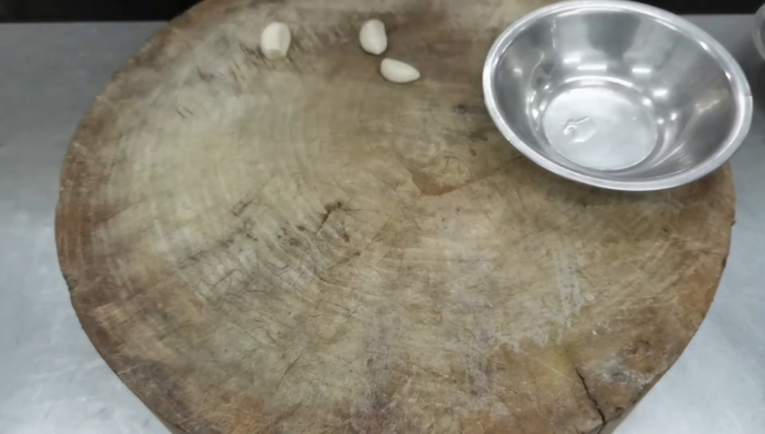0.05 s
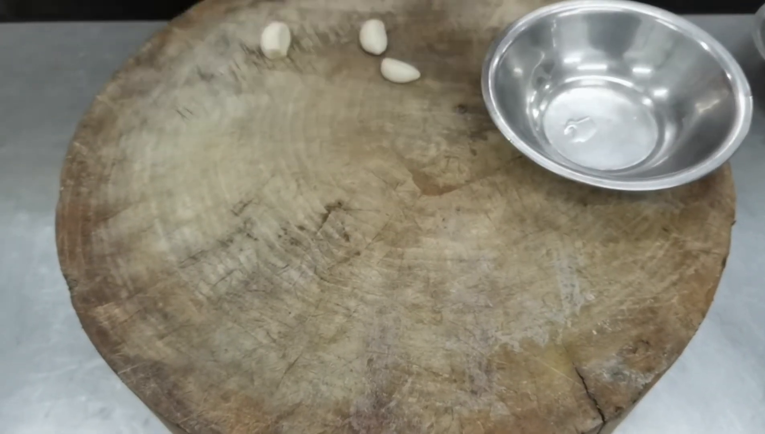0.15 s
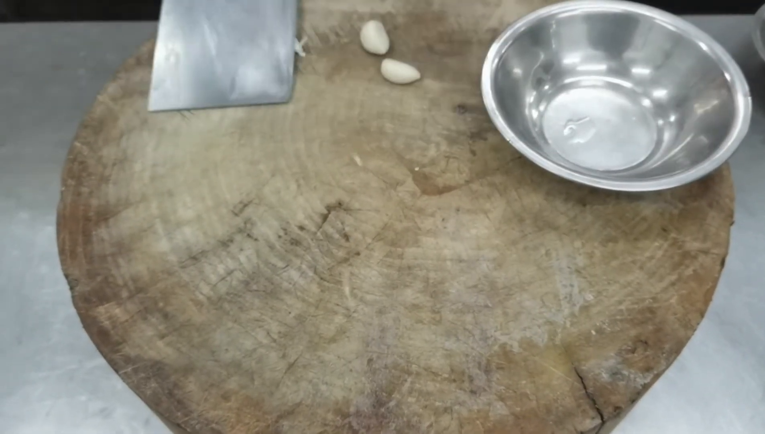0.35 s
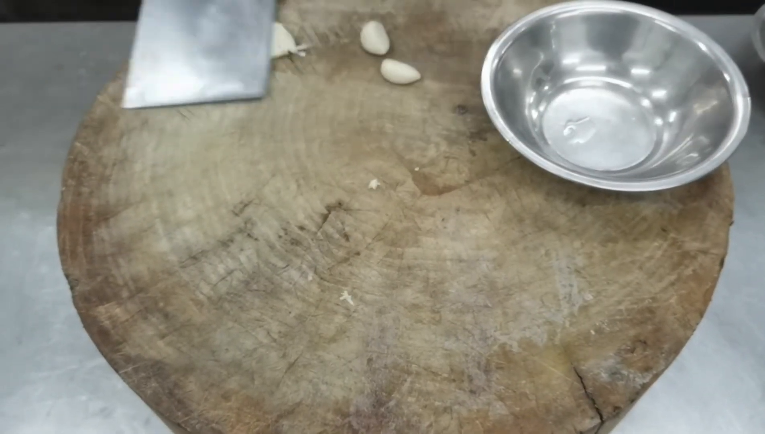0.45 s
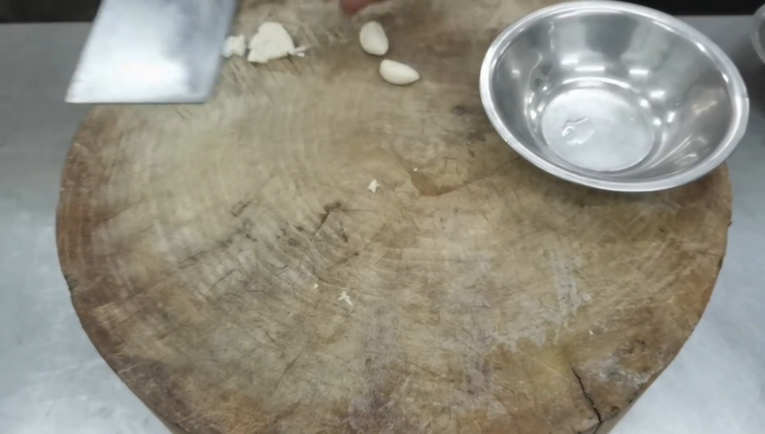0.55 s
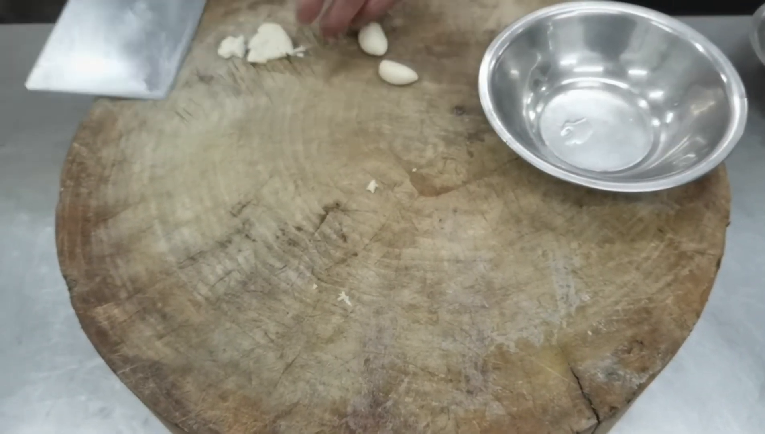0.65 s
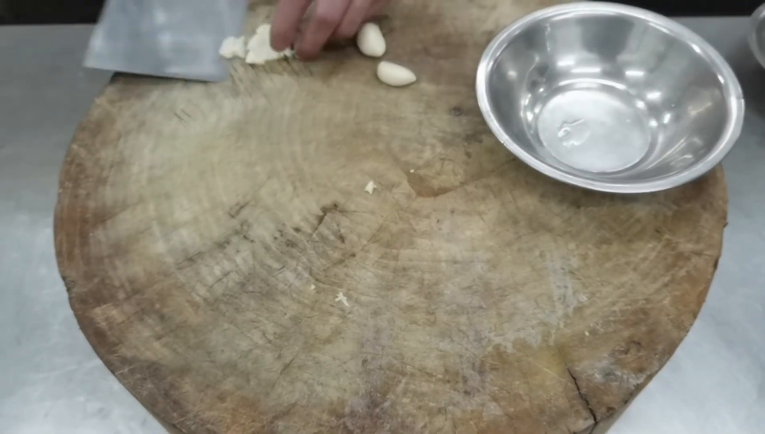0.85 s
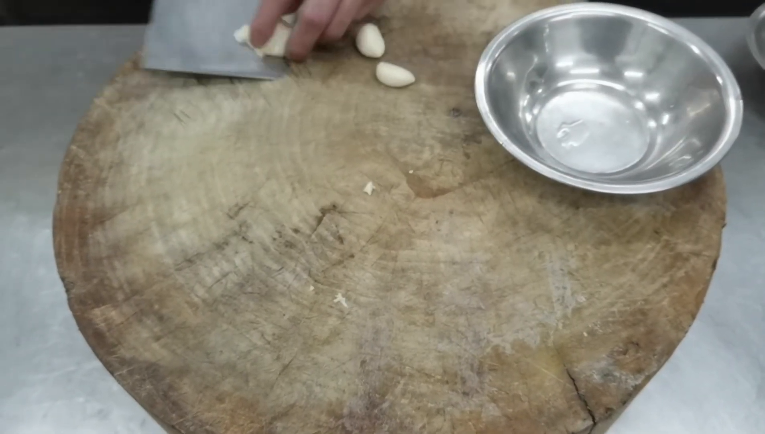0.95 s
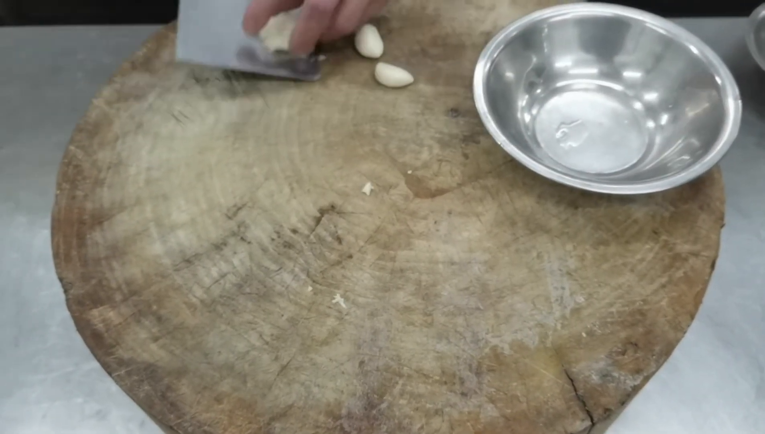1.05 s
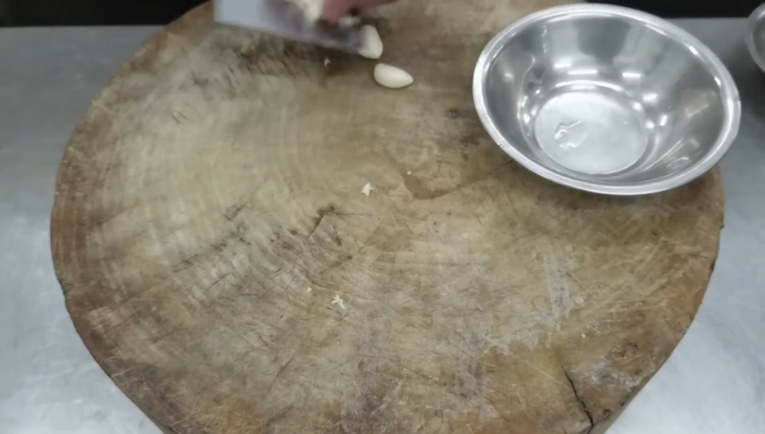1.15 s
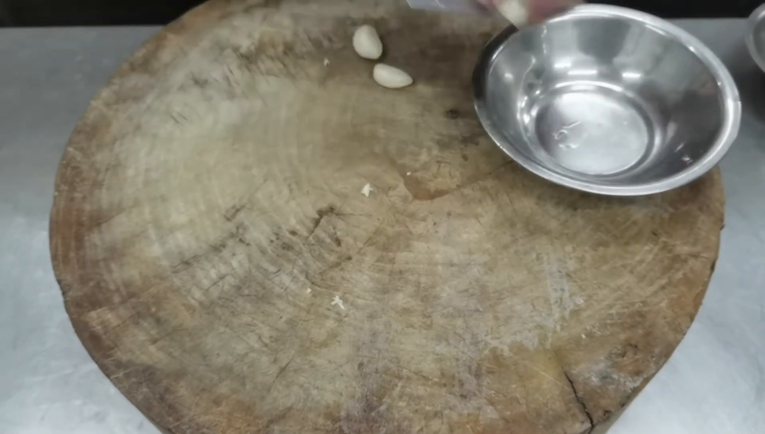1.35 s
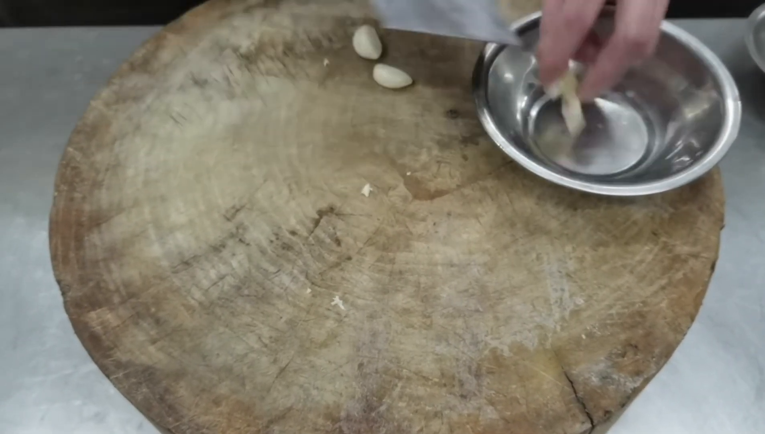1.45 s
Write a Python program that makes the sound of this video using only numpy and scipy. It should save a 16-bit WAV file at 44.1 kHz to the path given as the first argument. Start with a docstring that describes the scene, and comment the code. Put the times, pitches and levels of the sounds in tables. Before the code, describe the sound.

A steel cleaver smashes a garlic clove on a thick wooden block with one loud clap and booming thud. The blade scrapes softly, then garlic drops into a metal bowl. Heard close in an echoing kitchen with humming ventilation.

```python
"""A steel cleaver, laid flat, smashes a garlic clove on a thick wooden block.
The blade claps and rings, the clove crunches, and the table under the block booms.
The blade then scrapes up the pulp, which slides off the steel and drops into a metal bowl.
The kitchen's hard walls echo, and a ventilator hums throughout."""
import sys
import numpy as np
from scipy import signal
from scipy.fft import rfft, irfft
from scipy.io import wavfile
from scipy.ndimage import uniform_filter1d

SR = 44100
rng = np.random.default_rng(int(sys.argv[2]) if len(sys.argv) > 2 else 0)


def wav_out(sig):
    """Save sig, one row per channel (or a flat mono array), as 16-bit PCM at SR to the path in sys.argv[1]."""
    wavfile.write(sys.argv[1], SR, np.round(np.clip(np.atleast_2d(sig).T, -1, 1) * 32767).astype(np.int16))


N = 66150
T = np.arange(N) / SR
FREQS_HZ = np.fft.rfftfreq(N, 1 / SR)

# A "colour" says how strong each pitch is in a sound. A "mode" is a tone that a struck thing rings at.
# fade_s is the time to fall by 60 dB; decay_s is the time to fall to about a third.
# colour of the ventilator's rushing air: pitch_hz, relative_db
AIR_COLOUR = [(13, -46.5), (22, 2), (70, -11.5), (103, 1.5), (147, -19), (236, -12), (278, -17), (420, -23),
              (524, -34.5), (861, -28), (1580, -42), (2260, -40.5), (4500, -46.5), (13600, -51),
              (16000, -69)]
# the kitchen's echo, band by band: pitch_hz, level_db, fade_s
ECHO_BANDS = [(150, -1, 0.81), (500, -8.5, 0.52), (1000, -0.5, 0.76), (2156, -3.5, 0.62),
              (4000, -0.5, 0.68), (7450, -2.5, 0.61), (10400, -4, 0.51), (14000, -5.5, 0.23)]
# colour of the clap that the blade throws at the walls: pitch_hz, relative_db
THROWN_COLOUR = [(100, -14.5), (330, -3), (560, -5), (850, -3), (1250, -5), (1700, -1), (2300, 1),
                 (3000, -4), (3900, 0.5), (5000, -2.5), (6100, -6), (7400, -2), (9000, -8.5), (10300, -7.5),
                 (12000, -10), (15500, -24.5)]
# clusters of close blade modes in that clap: pitch_hz, width_hz, boost_db
THROWN_PEAKS = [(1610, 50, 5.5), (1868, 40, -0.5), (2177, 99, 11.5), (2456, 70, 9), (2874, 120, 8.5),
                (3210, 41, 8.5), (3593, 22, 7), (9555, 62, 7), (9900, 87, 2)]
# garlic landing in the bowl: start_s, pat_gain_db, ring_gain_db
GARLIC_DROPS = [(1.4777, 0.5, -2), (1.4867, -1.5, 1)]
# colour of a wet pat: pitch_hz, relative_db
PAT_COLOUR = [(200, -42), (400, -16), (600, 3), (1000, 4), (1800, -10), (4000, -15), (5200, -27),
              (9000, -14.5), (15000, -30)]
# modes of the bowl: pitch_hz, relative_db, fade_s
BOWL_MODES = [(491, -37.5, .4), (600, -63, .15), (630, -45.5, 0.21), (830, -40.5, 0.15), (910, -41.5, 0.14),
              (1106, -31.5, 0.12), (1334, -60, 0.084), (1730, -55, .1), (2200, -51, 0.11), (2500, -51, .15),
              (3200, -53.5, 0.17), (4350, -57, 0.25), (8100, -52, .1), (9950, -49, 0.27)]
# strokes of steel on wood and pulp: start_s, rise_s, hold_s, fall_s, level_db, tilt_db_per_octave
STROKES = [(0.559, 0.039, 0.047, 0.036, -45, -3.5), (0.758, 0.043, 0.0084, 0.047, -49, 5),
           (0.82, 0.04, 0.1, 0.06, -54.5, 1.1), (1.341, 0.037, .02, .02, -66.5, -4.5),
           (1.416, 0.021, 0.03, .04, -53, -6), (1.433, .017, 0.0021, 0.0072, -43.5, -1)]
# colour of the scraping: pitch_hz, relative_db
SCRAPE_COLOUR = [(500, -18.5), (1500, -18), (3000, -2.5), (4200, -4.5), (5400, -2), (8000, 5.5),
                 (10200, -2.5), (13000, -4), (15500, -6)]
# pitches that rubbed steel brings out: pitch_hz, width_hz, boost_db
SCRAPE_PEAKS = [(4047, 50, 13.5), (4700, 73, 6.5), (6050, 36, 7.5), (7840, 70, 6.5), (8440, 43, 5),
                (8720, 52, 7.5), (9740, 135, 14), (10300, 76, 15), (11060, 60, 13.5), (11550, 70, 8),
                (12400, 70, 14.5), (12850, 80, 10)]
# blade modes that the strokes set singing: start_s, pitch_hz, width_hz, level_db, rise_s, decay_s
SINGING_MODES = [(0.57, 3060, 44, -56.5, 0.045, 0.11), (0.84, 1750, 53, -59, 0.05, 0.082),
                 (.955, 2810, 180, -53, 0.044, 0.056), (1.444, 3895, 36, -38.5, 0.0062, 0.022),
                 (1.436, 4630, 34, -43, 0.0051, 0.011), (1.432, 2660, 220, -45, 0.0087, 0.039)]
# colour of the blade's soft bump on the block: pitch_hz, relative_db
BUMP_COLOUR = [(80, 12), (300, -10.5), (650, -11), (1200, -26), (3000, -37)]
# modes of block and table: pitch_hz, level_db, fade_s, rise_s
TABLE_MODES = [(36.15, -20, 1.37, 0.62), (71.76, -19.5, 0.93, 0.03), (102.5, -26, 1.42, .03),
               (138.4, -34, 1.5, 0.12), (223.8, -30, 0.82, 0.038), (275, -37, .6, .02),
               (318.4, -33.5, 0.64, .003), (421.2, -42, 0.97, 0.0078)]
# colour of the rumbling table top and frame: pitch_hz, relative_db
RUMBLE_COLOUR = [(20, -10), (45, -4), (62, -7.5), (115, 4), (170, -9.5), (230, -4.5), (400, -13.5),
                 (520, -24.5), (900, -53)]
# modes of the cleaver: pitch_hz, relative_db, fade_s
BLADE_MODES = [(903, -29.5, 0.18), (1651, -24.5, .25), (1841, -34.5, .5), (2232, -29, .45),
               (2262, -45, 0.79), (2425, -31.5, 0.54), (3304, -24.5, .3), (3538, -27, .22),
               (3994, -24.5, .25), (4350, -28, 0.23), (7230, -22, 0.069), (7990, -29.5, 0.18),
               (9400, -26.5, 0.15), (10194, -28, 0.36)]
# the blade hits the clove, then the wood: delay_s, level_db, decay_s, tilt_db_per_octave
SMASH_HITS = [(0, -6.5, 0.0029, -1), (.0036, -10, 0.0084, 2)]
# colour of the clap and the crunch: pitch_hz, relative_db
CLAP_COLOUR = [(100, -12), (330, -1.5), (540, -32.5), (850, -1), (1250, -8), (2200, 2), (3700, 1),
               (5600, -9), (7600, -3.5), (10200, -5.5), (12500, -15), (15500, -34)]
# colour of the wood's dry knock: pitch_hz, relative_db
KNOCK_COLOUR = [(200, -17.5), (550, -15.5), (850, 1), (1150, -5.5), (1700, 2), (2400, -9), (4000, -20.5),
                (9000, -39)]

SMASH_START_S, SMASH_RISE_S = .2186, .0003
DECAYS_PER_FADE = np.log(1000)  # fade_s divided by this gives decay_s


def gain(db):
    """Turn decibels into a factor to multiply by."""
    return 10 ** (np.asarray(db) / 20)


def normalise(x):
    """Scale a sound to an average power of 1."""
    return x / np.sqrt(np.mean(x ** 2))


def pan(left_db):
    """Left and right gains that make the left side louder by left_db."""
    return gain(np.array([[left_db], [-left_db]]) / 2)


def colour(x, points, tilt_db=0, peaks=()):
    """Give a sound a colour, a tilt toward treble or bass, and ringing peaks; its power ends up at 1."""
    pitches_hz, levels_db = np.array(points, float).T
    curve_db = np.interp(np.log(FREQS_HZ + 1), np.log(pitches_hz), levels_db)
    octaves = np.log2(FREQS_HZ / SR + 1e-3)
    shape = gain(curve_db + tilt_db * octaves)
    for hz, width, db in peaks:
        shape = shape * (1 + (gain(db) - 1) / (1 + 2j * (FREQS_HZ - hz) / width))
    return normalise(irfft(rfft(x) * shape, N))


def spread(pair, wide_above_hz=903.5, bass_side_db=-12.5):
    """Turn two unrelated sounds into left and right: alike in the bass, unrelated in the treble."""
    width = np.maximum(FREQS_HZ / np.hypot(FREQS_HZ, wide_above_hz), gain(bass_side_db))
    side = irfft(rfft(pair[1]) * width, N)
    return normalise(np.array([pair[0] + side, pair[0] - side]))


def noise():
    """An even hiss in stereo."""
    return spread(rng.standard_normal((2, N)))


def clicks(per_s, uneven_db):
    """A stereo stream of tiny clicks of uneven size."""
    hits = rng.random((2, N)) < per_s / SR
    signs = np.sign(rng.standard_normal((2, N)))
    sizes = gain(uneven_db * rng.exponential(size=(2, N)))
    return spread(hits * signs * sizes)


def burst(start_s, rise_s, decay_s):
    """A loudness curve that rises, then dies away."""
    age = np.maximum(T - start_s, 0)
    return (1 - np.exp(-age / rise_s)) * np.exp(-age / decay_s)


def ring(modes, start_s, rise_s, scatter_rad=0):
    """Fading tones struck together; scatter shifts each wave at random for each ear."""
    age = np.maximum(T - start_s, 0)
    out = 0
    for hz, db, fade_s in modes:
        phase = 2 * np.pi * hz * age + scatter_rad * rng.standard_normal((2, 1))
        out = out + gain(db) * burst(start_s, rise_s, fade_s / DECAYS_PER_FADE) * np.sin(phase)
    return out


def ventilator(air_db=-49.5, hum_hz=103.4, hum_db=-62.5, waver_db=5.5):
    """A low rush of air with a wavering hum."""
    drift = uniform_filter1d(rng.standard_normal(N), size=4000)
    waver = normalise(uniform_filter1d(drift, size=4000))
    hum = np.sqrt(2) * gain(hum_db + waver_db * waver) * np.sin(2 * np.pi * hum_hz * T)
    return gain(air_db) * colour(noise(), AIR_COLOUR) + hum


def kitchen_echo(x, delay_s=.0017, rise_s=.01):
    """Hard walls smear a sound into an echo that dies sooner in the treble."""
    hiss_spectrum = rfft(noise())
    log_pitches = np.log([row[0] for row in ECHO_BANDS])
    tail = 0
    for this_band, (_, db, fade_s) in zip(np.eye(len(ECHO_BANDS)), ECHO_BANDS):
        band = np.interp(np.log(FREQS_HZ + 1), log_pitches, this_band)
        fade = burst(delay_s, rise_s, fade_s / DECAYS_PER_FADE)
        tail = tail + gain(db) * irfft(hiss_spectrum * band, N) * fade / np.sqrt(np.sum(fade ** 2))
    return signal.fftconvolve(x.mean(axis=0, keepdims=True), tail, axes=1)[:, :N]


def thrown_clap(strength_db=15.5):
    """To the far walls, the whole smash is one steely click."""
    click = np.zeros(N)
    click[int(SMASH_START_S * SR)] = 1
    return gain(strength_db) * colour(click, THROWN_COLOUR, peaks=THROWN_PEAKS) / np.sqrt(N)


def bowl(pat_base_db=-35):
    """Soft pieces of garlic pat into the metal bowl and make it ring."""
    out = 0
    for start_s, pat_db, ring_db in GARLIC_DROPS:
        pat = burst(start_s, rise_s=.00027, decay_s=.0043) * colour(noise(), PAT_COLOUR)
        tones = ring(BOWL_MODES, start_s, rise_s=.00081, scatter_rad=.74)
        out = out + gain(pat_base_db + pat_db) * pat + gain(ring_db) * tones
    return out * pan(left_db=.5)


def scraping(bump_db=-38):
    """Rubbing makes dense tiny clicks that set the steel singing; the blade bumps the block once."""
    bump = burst(start_s=.681, rise_s=.0016, decay_s=.014) * colour(noise(), BUMP_COLOUR)
    out = gain(bump_db) * bump
    for start_s, rise_s, hold_s, fall_s, db, tilt_db in STROKES:
        pressure = np.interp(T, start_s + np.cumsum([0, rise_s, hold_s, fall_s]), [0, 1, 1, 0])
        rubbing = colour(clicks(per_s=4500, uneven_db=2.5), SCRAPE_COLOUR, tilt_db, SCRAPE_PEAKS)
        out = out + gain(db) * pressure * rubbing
    for start_s, hz, width, db, rise_s, decay_s in SINGING_MODES:
        # a narrow slice of hiss sounds like a rough tone
        tone = irfft(rfft(noise()) / (1 + 1j * (FREQS_HZ - hz) / width) ** 2, N)
        out = out + gain(db) * burst(start_s, rise_s, decay_s) * normalise(tone)
    return out * pan(left_db=3)


def table_boom(rumble_db=-25.5, rumble_fade_s=1.164):
    """The blow sets the heavy block swinging, and the table follows."""
    swell = burst(SMASH_START_S, rise_s=.012, decay_s=rumble_fade_s / DECAYS_PER_FADE)
    rumble = gain(rumble_db) * swell * colour(noise(), RUMBLE_COLOUR)
    return rumble + sum(ring([mode], SMASH_START_S, rise_s) for *mode, rise_s in TABLE_MODES)


def blade_ring(gain_db=-3):
    """The struck steel rings on after the blow."""
    tones = ring(BLADE_MODES, SMASH_START_S, rise_s=.0025, scatter_rad=.42)
    return gain(gain_db) * tones * pan(left_db=3)


def smash(knock_db=-18.5, crunch_db=-19):
    """The blade claps on clove, then block; the wood knocks and the clove's cells burst with a crunch."""
    claps = 0
    for delay_s, db, decay_s, tilt_db in SMASH_HITS:
        loudness = gain(db) * burst(SMASH_START_S + delay_s, SMASH_RISE_S, decay_s)
        claps = claps + loudness * colour(noise(), CLAP_COLOUR, tilt_db)
    wood = colour(rng.standard_normal(N), KNOCK_COLOUR)
    knock = gain(knock_db) * burst(SMASH_START_S, SMASH_RISE_S, decay_s=.004) * wood
    cells = colour(clicks(per_s=2900, uneven_db=3.5), CLAP_COLOUR)
    crunch = gain(crunch_db) * burst(SMASH_START_S, rise_s=.002, decay_s=.0065) * cells
    return (claps + knock + crunch) * pan(left_db=4.5)


def scene():
    """Cleaver and bowl with their echo, over the table's boom and the ventilator."""
    blade, strokes, drops = blade_ring(), scraping(), bowl()
    to_walls = thrown_clap() + gain(db=-1.5) * blade + gain(db=-7.5) * strokes + gain(db=1) * drops
    echo = kitchen_echo(to_walls)
    return smash() + blade + strokes + drops + echo + table_boom() + ventilator()


def record(dry, top_hz=15600):
    """Round off the loudest peaks and cut the highest treble."""
    treble_cut = signal.ellip(8, .2, 80, top_hz, fs=SR, output="sos")
    return signal.sosfilt(treble_cut, np.tanh(dry))


dry = scene()
out = record(dry)
wav_out(out)
```